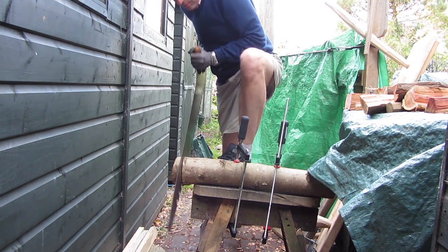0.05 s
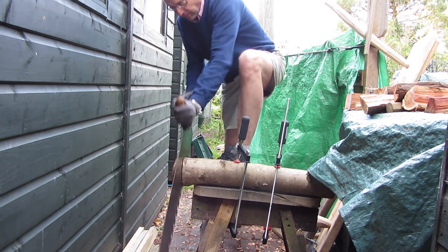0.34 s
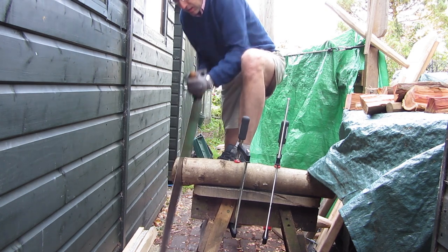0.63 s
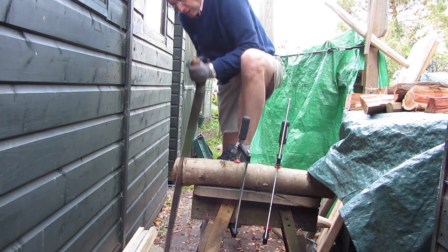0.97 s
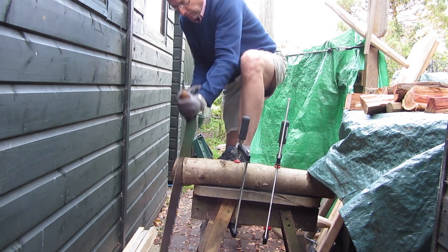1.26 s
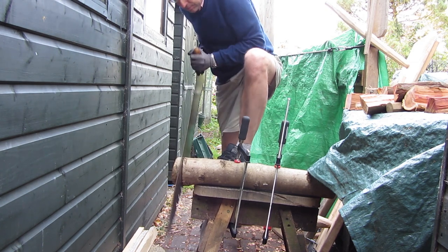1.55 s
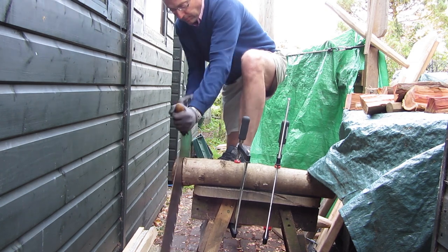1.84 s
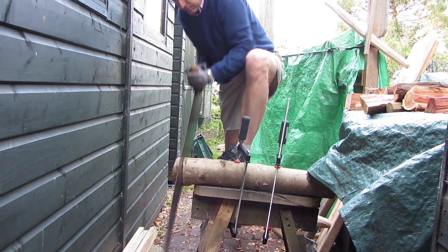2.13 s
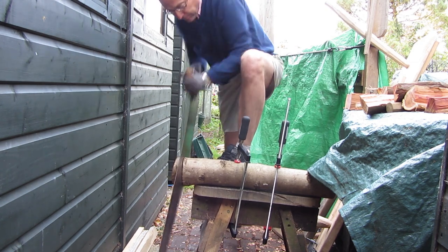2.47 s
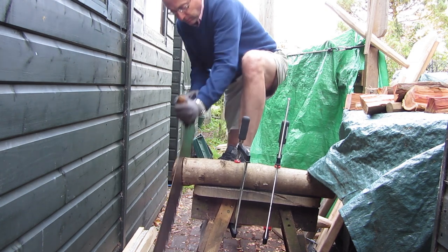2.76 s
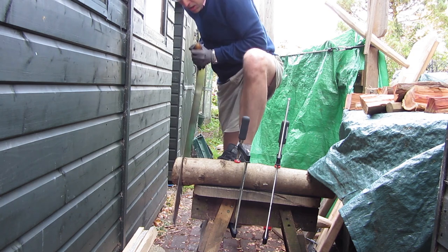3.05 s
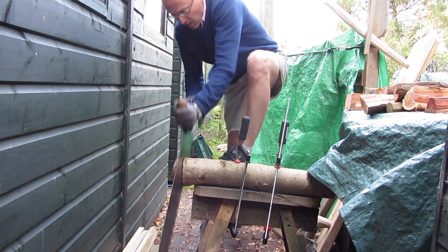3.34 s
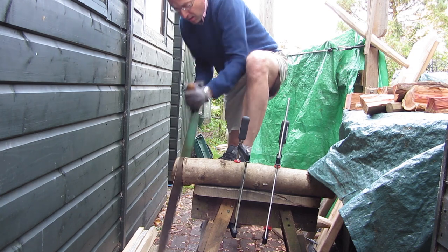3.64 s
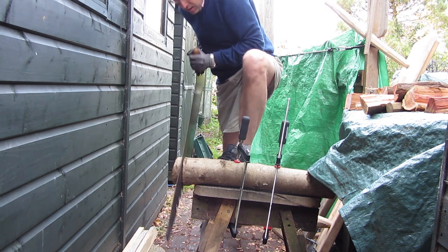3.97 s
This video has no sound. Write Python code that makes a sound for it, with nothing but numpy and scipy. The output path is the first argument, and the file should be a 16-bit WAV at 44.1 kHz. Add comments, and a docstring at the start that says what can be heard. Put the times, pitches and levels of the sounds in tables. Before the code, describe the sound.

A large hand saw rasps through a log outdoors, louder pushes alternating with lighter pulls and brief pauses between. Small splintering cracks, occasional wooden thuds and a faint ring from the blade accompany the strokes.

```python
"""A large hand saw cuts through a log on a sawhorse, outdoors beside a wooden shed.
Loud pushes alternate with lighter pulls; the teeth tear fibres in a ragged rasp that rings the log,
dotted with snapping splinters and short cracks. Snagging teeth jolt the trestle, the blade knocks
in the kerf now and then and sings faintly as most pushes run out. The shed and the ground throw back
short reflections over a faint bed of outdoor air."""
import sys
import numpy as np
from scipy import signal
from scipy.io import wavfile

SR = 44100
rng = np.random.default_rng(int(sys.argv[2]) if len(sys.argv) > 2 else 0)


def dump_mix(stems):
    """Bounce the given channels to the path in sys.argv[1] as a 16-bit WAV at rate SR."""
    frames = np.atleast_2d(stems).T  # one column per channel
    limited = np.clip(frames, -1, 1)  # hard clip at full scale
    pcm = np.round(limited * 32767).astype(np.int16)
    wavfile.write(sys.argv[1], SR, pcm)


N = 176400
T = np.arange(N) / SR


def from_db(db):
    """Decibels to gain."""
    return 10 ** (np.asarray(db) / 20)


def unit_rms(x):
    """Scales a signal to an RMS of 1."""
    return x / np.sqrt(np.mean(x ** 2) + 1e-20)


def at_hz(curve, hz):
    """Reads a curve along log frequency."""
    freqs, values = np.transpose(curve)
    return np.interp(np.log(hz), np.log(freqs), values)


def band(x, low_hz, high_hz, order=2):
    """Butterworth band-pass."""
    return signal.sosfilt(signal.butter(order, [low_hz, high_hz], "band", fs=SR, output="sos"), x + 1e-18)


def drift(rate_hz):
    """A smooth random modulator with a spread of 1."""
    hop, run_in = 40, 2000
    pole = np.exp(-2 * np.pi * rate_hz * hop / SR)
    noise = rng.standard_normal(N // hop + run_in + 2)
    slow = signal.lfilter([1], [1, -2 * pole, pole * pole], noise)[run_in:]
    return np.interp(np.arange(N) / hop, np.arange(len(slow)), unit_rms(slow))


def ring(x, hz, t60):
    """A resonator: a unit click starts a dying sine of height 1."""
    r, w = np.exp(-np.log(1000) / (t60 * SR)), 2 * np.pi * hz / SR
    return signal.lfilter([0, np.sin(w)], [1, -2 * r * np.cos(w), r * r], x + 1e-18)


def decay(x, decay_s):
    """One-pole low-pass: each click becomes a dying envelope."""
    return signal.lfilter([1], [1, -np.exp(-1 / (decay_s * SR))], x + 1e-18)


def clicks(cues):
    """One click for each (time [s], level [dB]) cue."""
    times, db = np.transpose(cues)
    out = np.zeros(N)
    out[(times * SR).astype(int)] = from_db(db)
    return out


# Pan across the spectrum: (frequency [Hz], left over right [dB])
PAN_CURVE = [(330, 4.5), (650, 2), (2500, -0.9), (5000, 0.6)]
def panned(x, hz):
    """Pans a sound by its frequency."""
    return x * from_db(at_hz(PAN_CURVE, hz) * np.array([[.5], [-.5]]))


# Stereo image: (frequency [Hz], left-right correlation [-1 to 1])
CORRELATION = [(150, 1), (500, 0.87), (1200, 0.65), (2400, 0.34), (4500, -0.5), (7500, -0.12), (11000, 0.3)]
def stereo(pair, hz):
    """Two unrelated signals become mid and side: narrow in the bass, wide in the treble."""
    alike = np.clip(at_hz(CORRELATION, hz), -.99, .99)
    mid, side = np.sqrt((1 + alike) / 2) * pair[0], np.sqrt((1 - alike) / 2) * pair[1]
    return panned(mid + side * [[1], [-1]], hz)


# Pull and push strokes of the arm: (start [s], full bite [s], easing off [s], stop [s])
PULLS = [(-0.1, -0.05, 0.01, 0.21), (0.551, 0.69, 0.78, 0.94), (1.315, 1.39, 1.515, 1.639),
         (2.012, 2.15, 2.28, 2.369), (2.785, 2.9, 3.04, 3.18), (3.588, 3.75, 3.823, 3.965)]
PUSHES = [(0.16, 0.285, 0.39, 0.5), (0.925, 1.099, 1.183, 1.3), (1.636, 1.782, 1.881, 1.974),
          (2.4, 2.56, 2.6386, 2.735), (3.171, 3.309, 3.426, 3.514)]
def strokes(start_db=-24, rest_db=-38, sag_db=1, take_hold_s=.012, settle_s=.03):
    """The arm swells, holds, eases and rests: force (0 dB is full) and direction (1 push, 0 pull)."""
    force_db, pushing = np.full(N, float(rest_db)), np.zeros(N)
    cues = sorted([(*row, 0) for row in PULLS] + [(*row, 1) for row in PUSHES])
    for start, full, eases, stop, is_push in cues:
        held_db, stop_db = (1, -33) if is_push else (-4.5, -30)
        swell_power, release_power = (.85, 1.1) if is_push else (.6, 1.5)
        swell = np.interp(T, [start, full], [0, 1]) ** swell_power
        release = np.interp(T, [eases, stop], [0, 1]) ** release_power
        stroke_db = start_db + (held_db - start_db) * swell + (stop_db - held_db) * release
        stroke_db += np.interp(T, [full, eases], [0, -sag_db])
        stroke_db += np.interp(T, [stop, stop + settle_s], [0, rest_db - stop_db])
        crossfade = np.interp(T, [start, start + take_hold_s], [0, 1])
        force_db += crossfade * (stroke_db - force_db)
        pushing += crossfade * (is_push - pushing)
    return force_db, pushing


SPEED_TRACKING = .35   # dB of tooth and splinter rate per dB of force
def tooth_bites(force_db, teeth_per_s=190, jitter=.3, bite_s=.01, spread_db=6, friction=1.76):
    """Envelope of teeth biting over steady friction, in an uneven train that quickens with force."""
    rate = teeth_per_s * from_db(SPEED_TRACKING * force_db) * np.exp(jitter * drift(90))
    entering = np.diff(np.floor(np.cumsum(rate) / SR), prepend=0)
    depth = from_db(spread_db * np.clip(rng.standard_normal(N), -2, 2))
    bites = unit_rms(decay(entering * depth, bite_s))
    judder_db = 1.92 * drift(44.5)
    return unit_rms(friction + bites) * from_db(judder_db)


def fibres(bite, snaps_per_s=16000, spread_db=2):
    """Wood fibres snap in dense grains under each bite; two unrelated streams."""
    sizes = from_db(spread_db * rng.standard_normal((2, N))) * rng.choice([-1, 1], (2, N))
    snapping = rng.random((2, N)) < snaps_per_s / SR
    return bite * unit_rms(sizes * snapping)


def band_gains(eq, centres, widths, level_db):
    """Shares a total level among bands along an EQ curve."""
    gains = from_db(at_hz(eq, centres)) * np.sqrt(widths)
    return from_db(level_db) * gains / np.linalg.norm(gains)


# Tone of the rasp on the push and on the pull: (frequency [Hz], relative spectral density [dB])
PUSH_EQ = [(50, -18.5), (125, -11), (229, -27), (439, -4), (559, -14.5), (783, -7.5), (1120, -11),
           (2320, -7.5), (3950, -10), (8540, -4), (14500, -24.5)]
PULL_EQ = [(50, -19.5), (167, -14.5), (218, -63), (284, -16), (884, -4.5), (1120, -9), (2620, -5),
           (4140, -9), (8340, -1.5), (14200, -21)]
# How the rasp opens up with force: (frequency [Hz], tracking [dB per dB of force])
FORCE_TRACKING = [(100, 0.19), (500, 0.49), (2200, 0.7), (5500, 0.93)]
def rasp(force_db, pushing, bite, flicker_db=1.5, chatter_below_hz=2600):
    """Tearing fibres, coloured by stroke direction and brighter with force; the wood chatters."""
    edges = np.geomspace(35, 17000, 28)
    centres, widths = np.sqrt(edges[1:] * edges[:-1]), np.diff(edges)
    push = band_gains(PUSH_EQ, centres, widths, level_db=-19.5)
    pull = band_gains(PULL_EQ, centres, widths, level_db=-19)
    streams, out = [fibres(bite), fibres(bite)], 0
    chatter_db = 1.56 * drift(14.3)
    for k, hz in enumerate(centres):
        colour = pushing * push[k] + (1 - pushing) * pull[k]
        swing_db = at_hz(FORCE_TRACKING, hz) * force_db + flicker_db * drift(10.7)
        swing_db += chatter_db / (1 + (hz / chatter_below_hz) ** 2)
        grains = unit_rms(band(streams[k % 2], edges[k], edges[k + 1], order=3))
        out += colour * from_db(swing_db) * stereo(grains, hz)
    return out


# Resonances of log and blade: (frequency [Hz], bandwidth [Hz], level relative to the drive [dB])
BODY_MODES = [(468, 65, -40), (789, 25, -40.5), (850, 44, -37.5), (1330, 66, -39.5)]
def body_ring(force_db, pushing, bite, tracking=.5):
    """The teeth ring the log and the blade, a little harder on the push."""
    trim_db = np.interp(pushing, [0, 1], [-1.5, -.5])
    drive, out = fibres(bite) * from_db(tracking * force_db + trim_db), 0
    for hz, width, db in BODY_MODES:
        t60 = np.log(1000) / (np.pi * width)
        unity_gain = 2 * np.sqrt(np.pi * width / SR)   # noise comes out as loud as it goes in
        out += from_db(db) * unity_gain * stereo(ring(drive, hz, t60), hz)
    return out


def splinters(force_db, snaps_per_s=110, level_db=-29.5, spread_db=4, tracking=.49, ring_cycles=39):
    """Coarse splinters snap at random as pitched ticks, denser and louder with force."""
    pitches_hz = np.geomspace(602, 3620, 26)
    snapping = rng.random(N) < snaps_per_s * from_db(SPEED_TRACKING * force_db) / SR
    snap_db = level_db + tracking * force_db + spread_db * np.clip(rng.standard_normal(N), -2, 2)
    snaps = snapping * from_db(snap_db) * rng.choice([-1, 1], (2, N))
    voice = rng.integers(0, len(pitches_hz), N)
    return sum(stereo(ring(snaps * (voice == k), hz, ring_cycles / hz), hz)
               for k, hz in enumerate(pitches_hz))


def yard_reflections(x, t60=.059, predelay_s=.003, wet_db=-12.5):
    """A short scatter of reflections off the shed and the ground."""
    t = T[:SR // 2]
    tail = band(rng.standard_normal((2, len(t))), 190, 6000, order=1)
    tail *= np.exp(-np.log(1000) * t / t60) * (t > predelay_s)
    tail /= np.linalg.norm(tail, axis=1, keepdims=True)
    return from_db(wet_db) * signal.fftconvolve(x, tail, axes=1)[:, :N]


def outdoor_air(level_db=-58.5, corner_hz=250):
    """A faint outdoor bed, mostly low end."""
    noise = decay(rng.standard_normal((2, N)), 1 / (2 * np.pi * corner_hz))
    return from_db(level_db) * stereo(unit_rms(noise), corner_hz)


# Accents where the teeth grip: (time [s], force boost [dB])
GRIP_CUES = [(0.018, 4), (0.517, 10), (0.95, 8.5), (1.004, 5), (1.075, 4), (1.551, 5), (2.189, 4),
             (2.435, 6.5), (2.523, 7), (3.125, 4), (3.711, 7), (3.917, 8)]
def grips(attack_s=.004, slip_s=.025):
    """The teeth grip, so the force jumps and slips away again; returns the boost in dB."""
    boost_db = np.zeros(N)
    for start, db in GRIP_CUES:
        attack = np.interp(T, [start, start + attack_s], [0, 1])
        slip = np.exp(-(np.maximum(T - start, 0) / slip_s) ** 2)
        boost_db += db * attack * slip
    return boost_db


def impacts(cues, modes, crunch, crunch_s):
    """Clicks with a crunchy noise tail strike a set of modes of alternating polarity."""
    hits, out = clicks(cues), 0
    for k, (hz, db, t60) in enumerate(modes):
        contact = hits + crunch * decay(hits, crunch_s) * rng.standard_normal(N)
        out += (-1) ** k * from_db(db) * panned(ring(contact, hz, t60), hz)
    return out


# Snags of the teeth: (time [s], level [dB])
SNAG_CUES = [(0.197, -21), (0.372, -18), (0.872, -24.5), (1.08, -14), (1.199, -20), (1.859, -18.5),
             (2.474, -20), (2.584, -14), (3.404, -13), (3.72, -19), (3.739, -20)]
# Modes of log and trestle: (frequency [Hz], gain [dB], t60 [s])
TRESTLE_MODES = [(69, -19, 0.15), (110.6, -17, 0.11), (154, -17, 0.13), (290, -13, 0.059),
                 (440, -6.5, 0.064), (780, -24, 0.027)]
def trestle_jolts():
    """Snagging teeth jolt the log and trestle into a low wooden thud."""
    return impacts(SNAG_CUES, TRESTLE_MODES, crunch=.058, crunch_s=.0064)


# Notes of the blade as most pushes run out: (peak time [s], pitch [Hz], level [dB], t60 [s])
BLADE_NOTES = [(0.38, 444.5, -21, 0.21), (1.915, 768, -26.5, .12), (1.92, 2990, -43, 0.24),
               (1.92, 3350, -51, 0.54), (2.69, 1084, -41.5, 0.31), (3.456, 790, -27.5, 0.13),
               (3.49, 2990, -48, 0.33)]
def blade_song(rise_s=.011, waver_hz=8):
    """A blade mode swells under friction and dies as the saw stops."""
    out = 0
    for peak, hz, db, t60 in BLADE_NOTES:
        swell, release = (T - peak) / rise_s, np.log(1000) * (peak - T) / t60
        envelope = np.exp(np.minimum(swell, release).clip(-50, 0))
        tone = np.sin(2 * np.pi * np.cumsum(hz + waver_hz * drift(60)) / SR)
        out += panned(from_db(db) * envelope * tone, hz)
    return out


# Hits of the blade against the kerf: (time [s], level [dB])
KNOCK_CUES = [(0.503, -20.5), (1.269, -31.5), (3.404, -21.5), (3.72, -27)]
# Modes of that knock: (frequency [Hz], gain [dB], t60 [s])
KERF_MODES = [(295, -3.5, 0.039), (665, 1, 0.041), (980, -2, .02), (1580, 1, 0.021)]
def kerf_knocks():
    """The blade knocks in the kerf at the end of a stroke or on a hard snag."""
    return impacts(KNOCK_CUES, KERF_MODES, crunch=.049, crunch_s=.015)


# Cracks of a catching tooth: (time [s], level [dB])
CATCH_CUES = [(0.522, -32.5), (0.572, -38), (0.815, -33), (0.838, -26), (0.868, -26), (0.953, -24.5),
              (1.006, -21.5), (1.646, -29), (2.017, -29), (2.056, -33), (2.398, -30.5), (2.784, -33.5),
              (2.881, -23.5), (3.15, -28.5), (3.582, -38.5), (3.613, -29.5), (3.714, -22)]
def tooth_catches(decay_s=.0098):
    """A tooth catches and rips a short midrange burst of fibres."""
    ripping = unit_rms(band(fibres(bite=1), 625, 2690))
    return stereo(ripping, hz=1800) * decay(clicks(CATCH_CUES), decay_s)


def scene():
    """The arm's force drives the cutting; cued accents, reflections and air complete the mix."""
    force_db, pushing = strokes()
    force_db += grips()
    bite = tooth_bites(force_db)
    saw = rasp(force_db, pushing, bite) + body_ring(force_db, pushing, bite)
    saw += blade_song() + tooth_catches() + splinters(force_db)
    saw += trestle_jolts() + kerf_knocks()
    return saw + yard_reflections(saw) + outdoor_air()


LOW_CUT_HZ, CEILING, HIGH_CUT_HZ = 54.6, .76, 15900
def record(dry):
    """Master chain: sheds the deep bass, rounds the highest peaks and cuts the top steeply."""
    low_cut = signal.butter(4, LOW_CUT_HZ, "high", fs=SR, output="sos")
    high_cut = signal.ellip(10, .2, 80, HIGH_CUT_HZ, fs=SR, output="sos")
    rounded = CEILING * np.tanh(signal.sosfilt(low_cut, dry) / CEILING)
    return signal.sosfilt(high_cut, rounded)


dry = scene()
out = record(dry)
dump_mix(out)
```